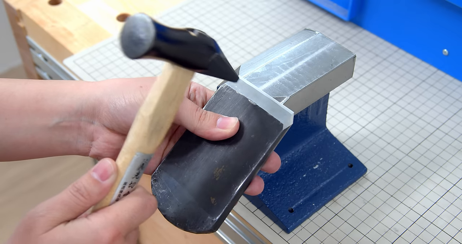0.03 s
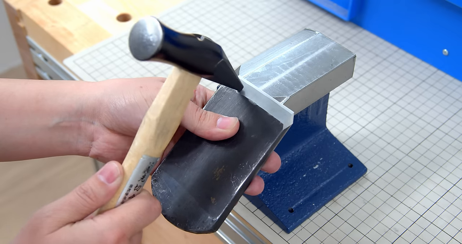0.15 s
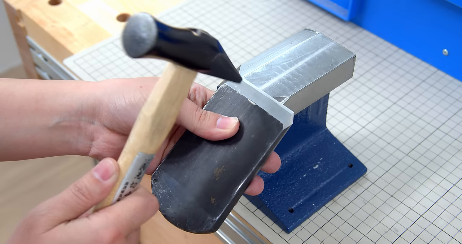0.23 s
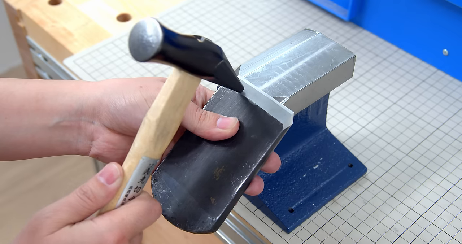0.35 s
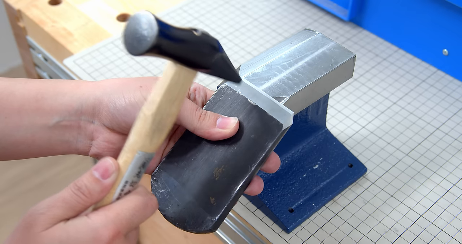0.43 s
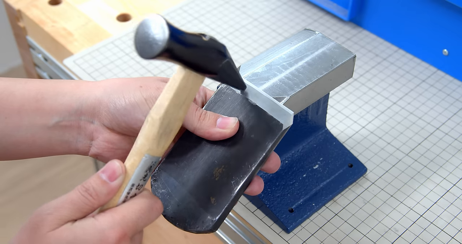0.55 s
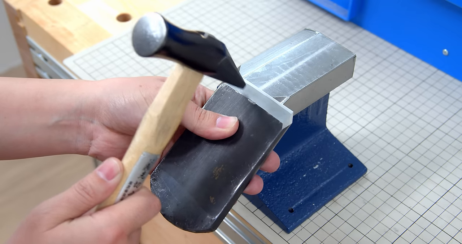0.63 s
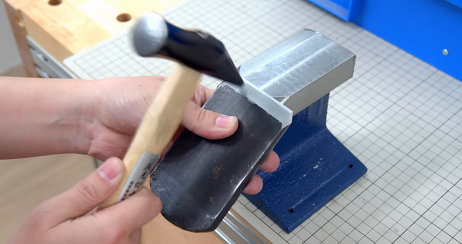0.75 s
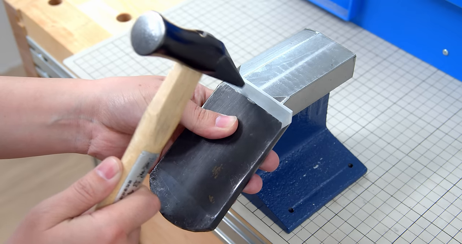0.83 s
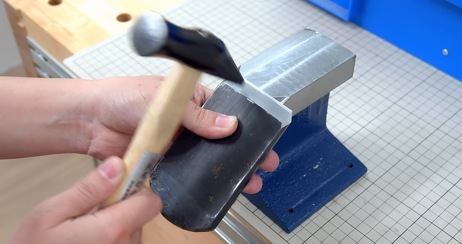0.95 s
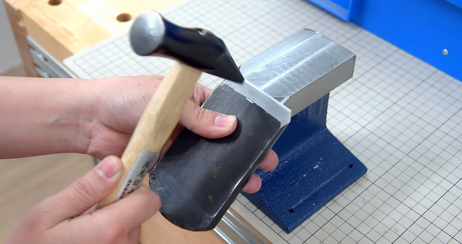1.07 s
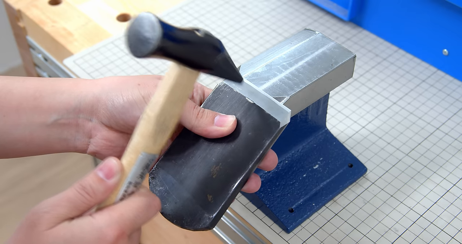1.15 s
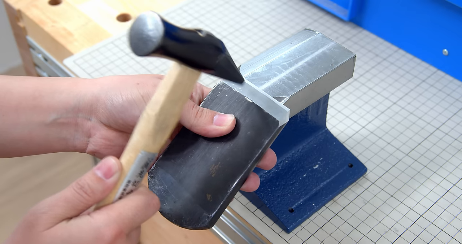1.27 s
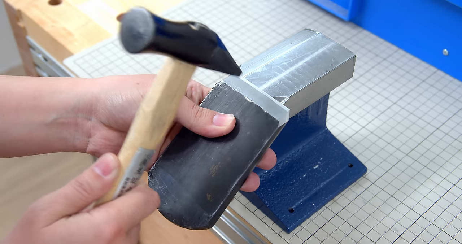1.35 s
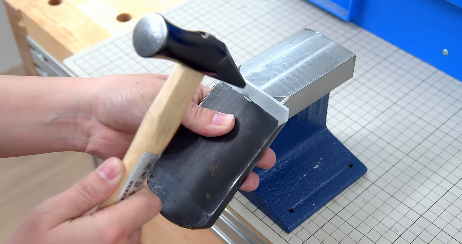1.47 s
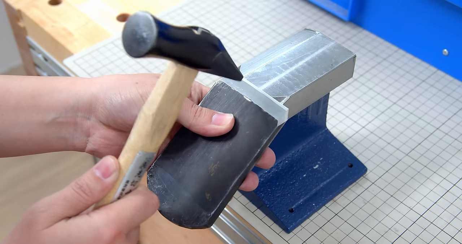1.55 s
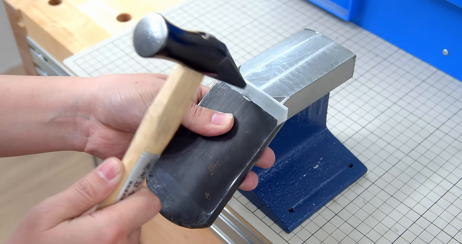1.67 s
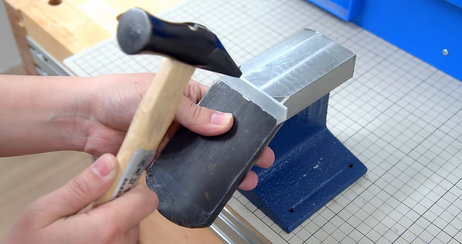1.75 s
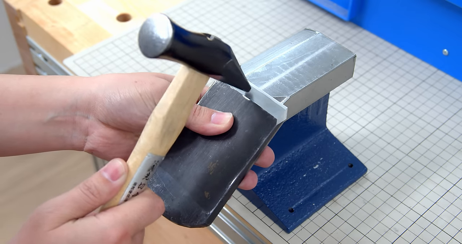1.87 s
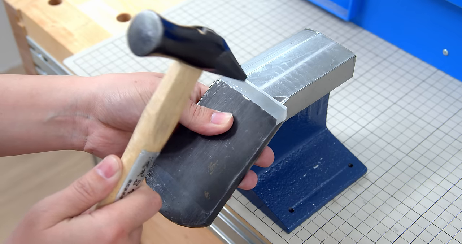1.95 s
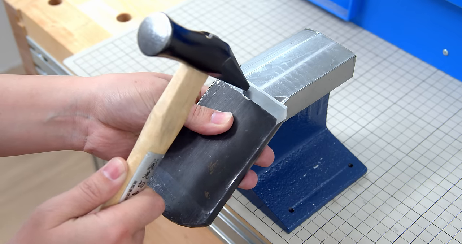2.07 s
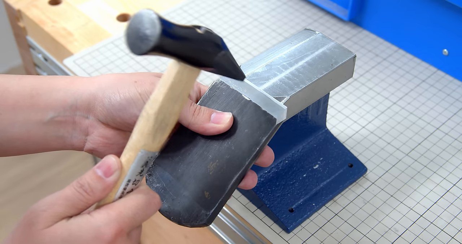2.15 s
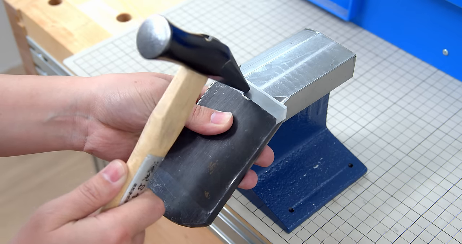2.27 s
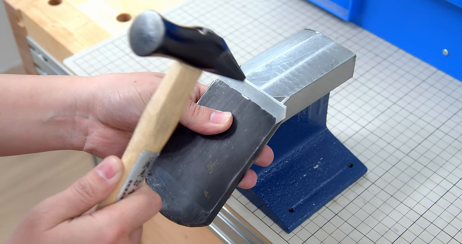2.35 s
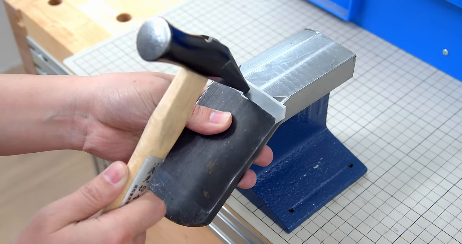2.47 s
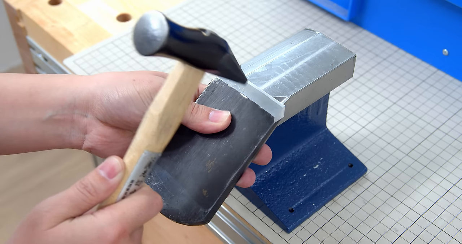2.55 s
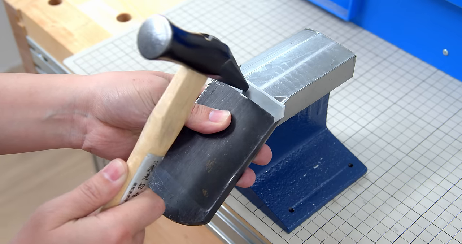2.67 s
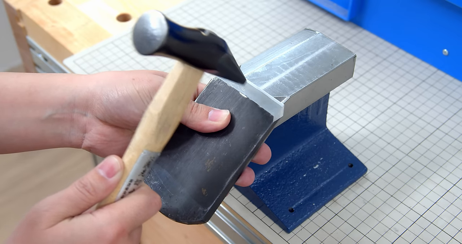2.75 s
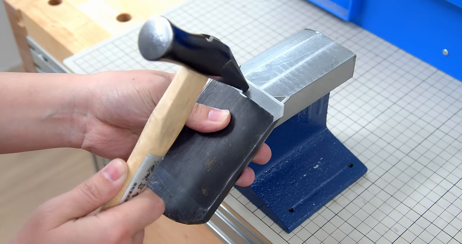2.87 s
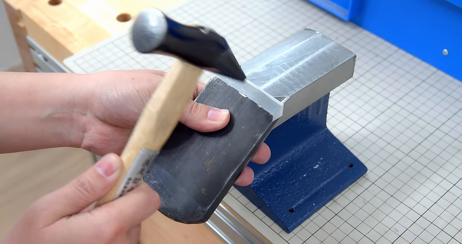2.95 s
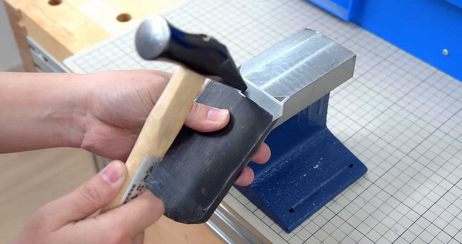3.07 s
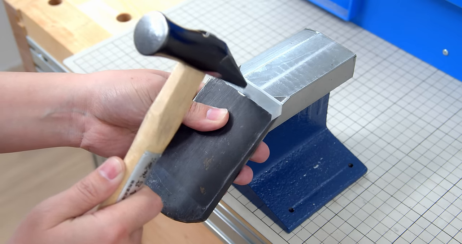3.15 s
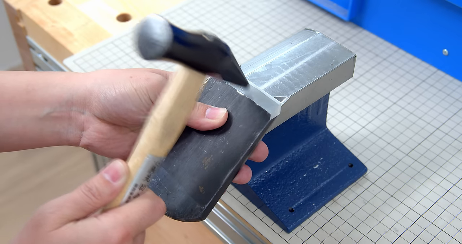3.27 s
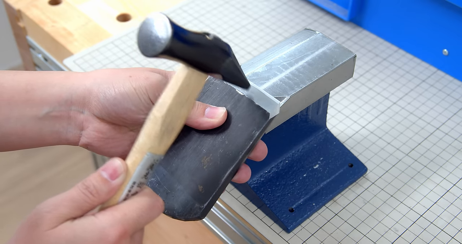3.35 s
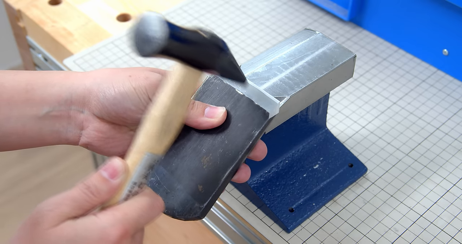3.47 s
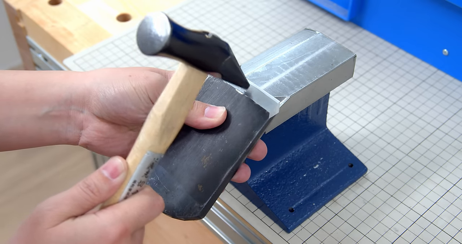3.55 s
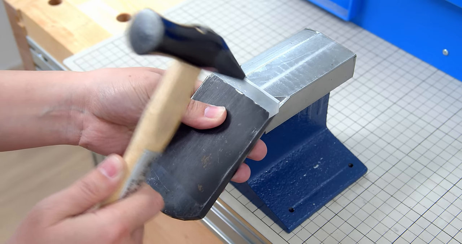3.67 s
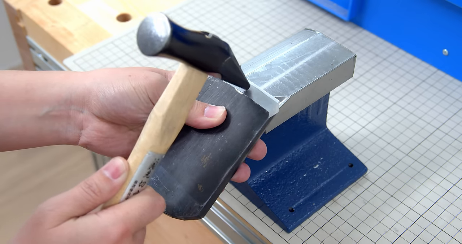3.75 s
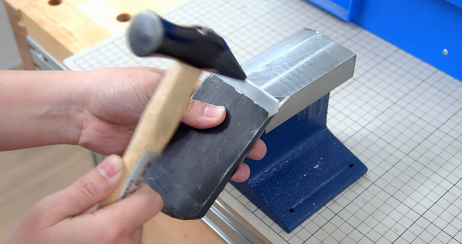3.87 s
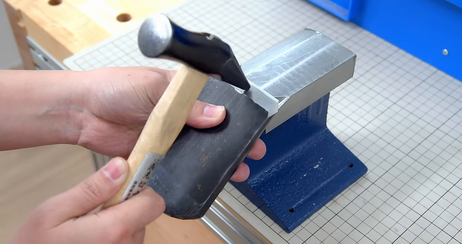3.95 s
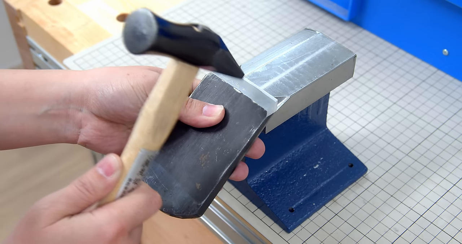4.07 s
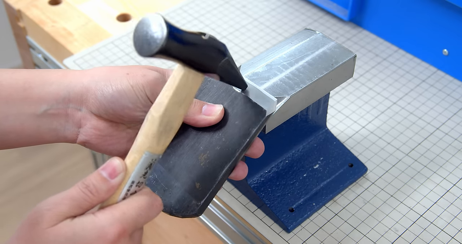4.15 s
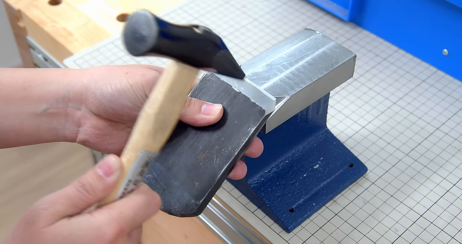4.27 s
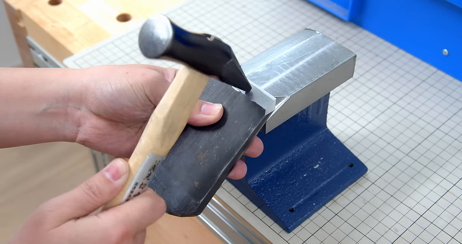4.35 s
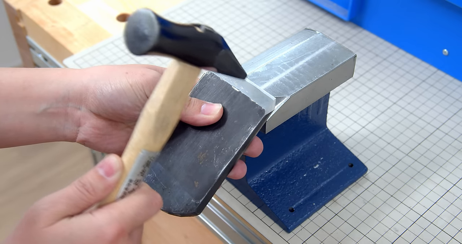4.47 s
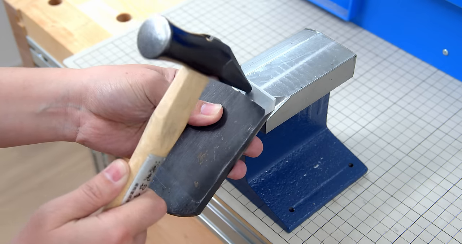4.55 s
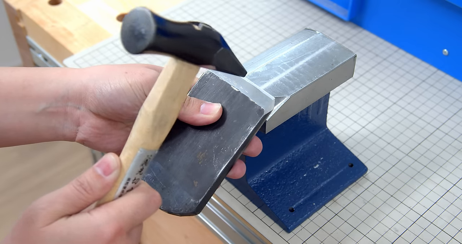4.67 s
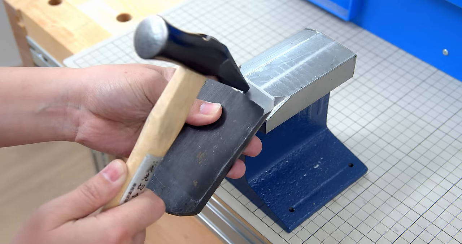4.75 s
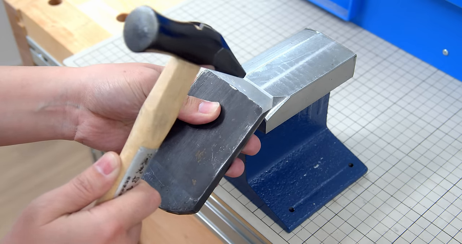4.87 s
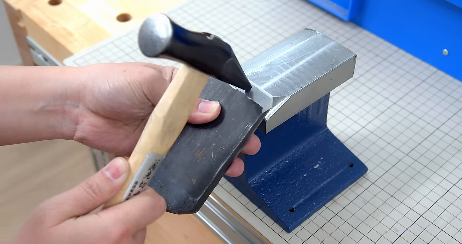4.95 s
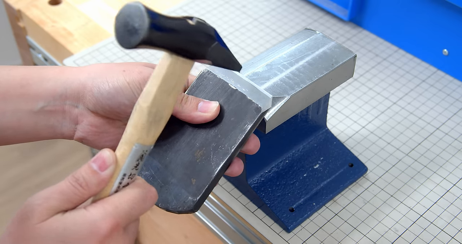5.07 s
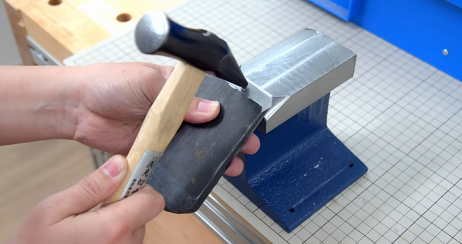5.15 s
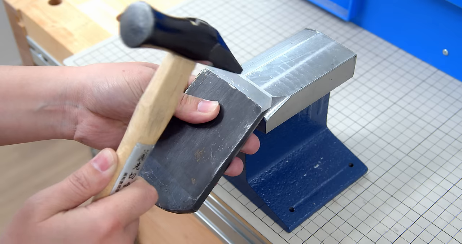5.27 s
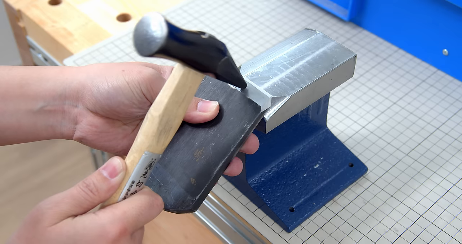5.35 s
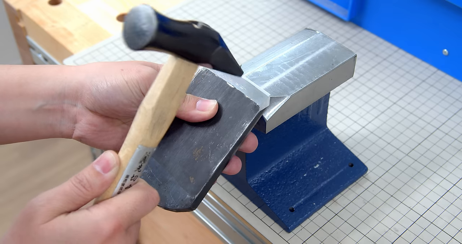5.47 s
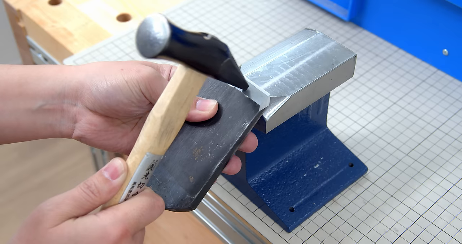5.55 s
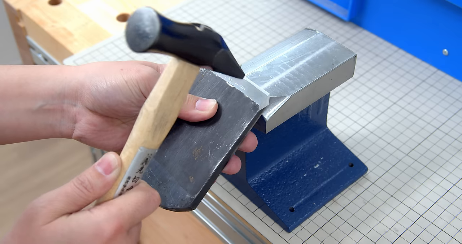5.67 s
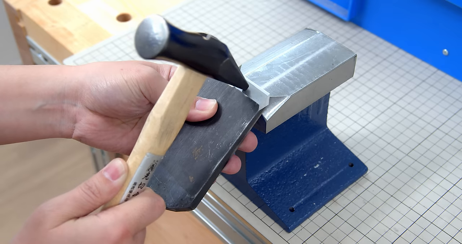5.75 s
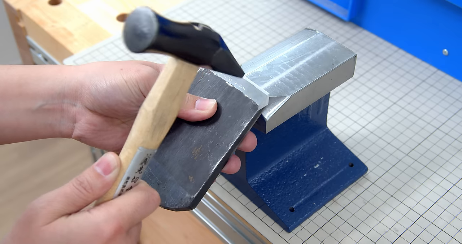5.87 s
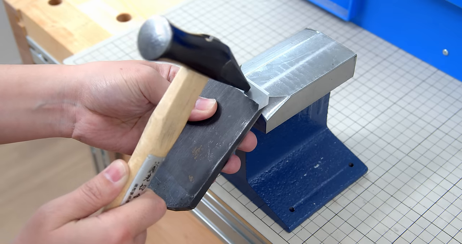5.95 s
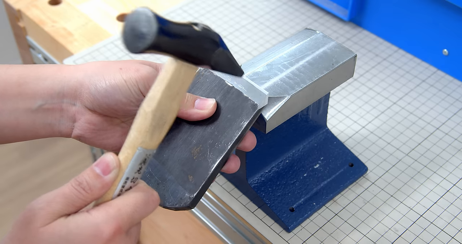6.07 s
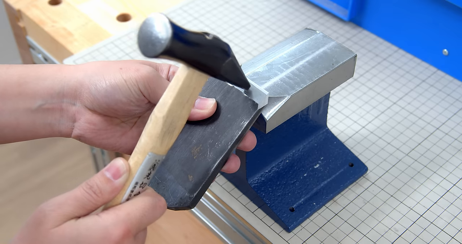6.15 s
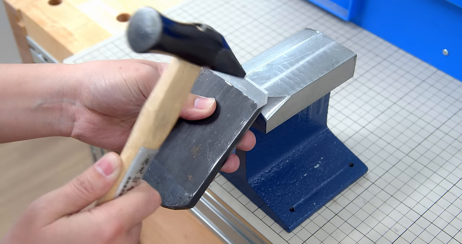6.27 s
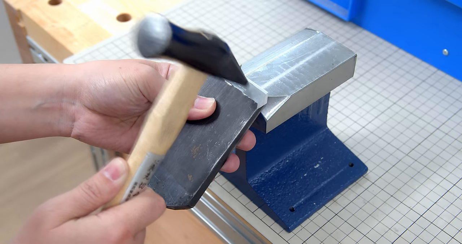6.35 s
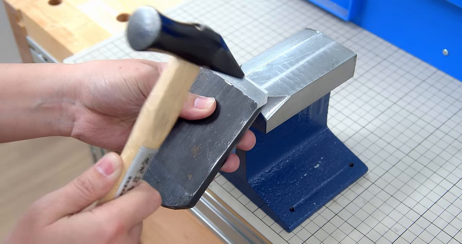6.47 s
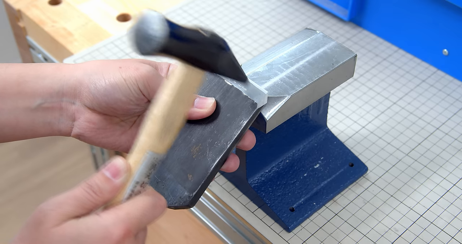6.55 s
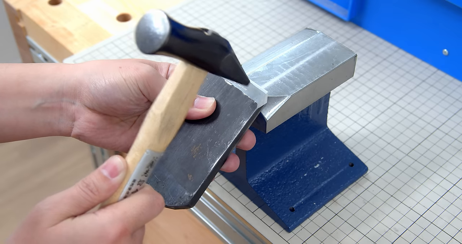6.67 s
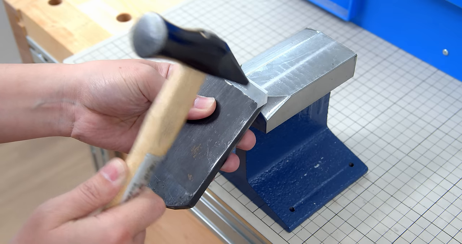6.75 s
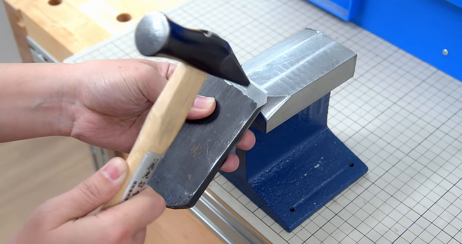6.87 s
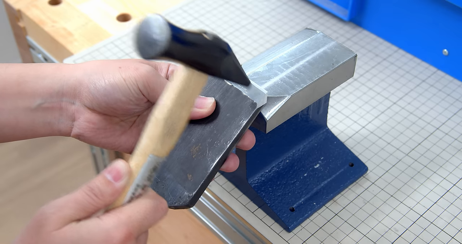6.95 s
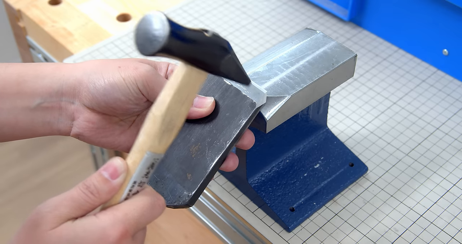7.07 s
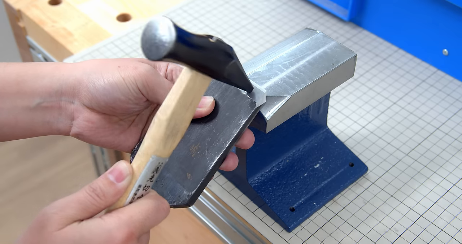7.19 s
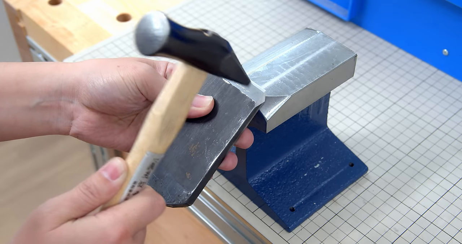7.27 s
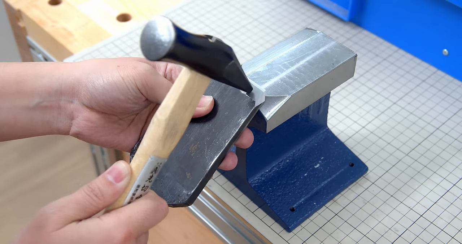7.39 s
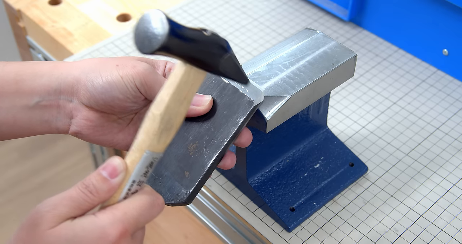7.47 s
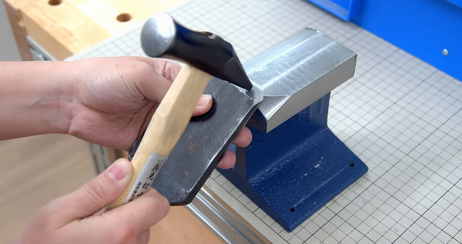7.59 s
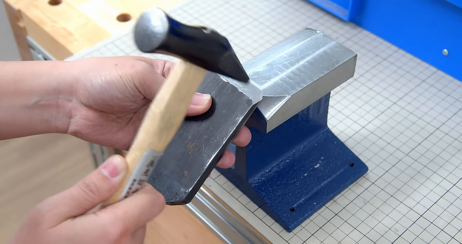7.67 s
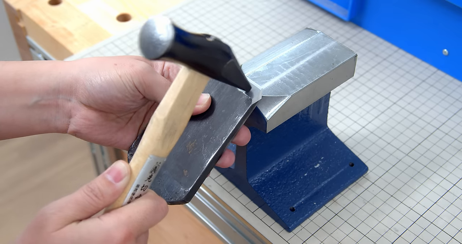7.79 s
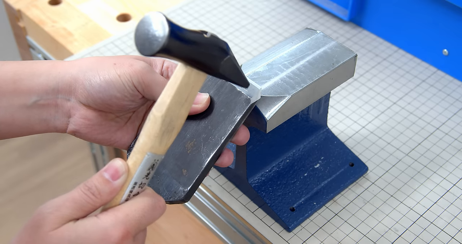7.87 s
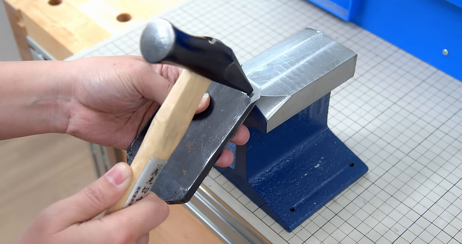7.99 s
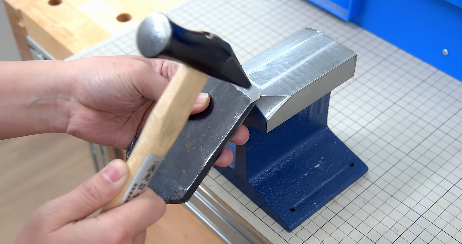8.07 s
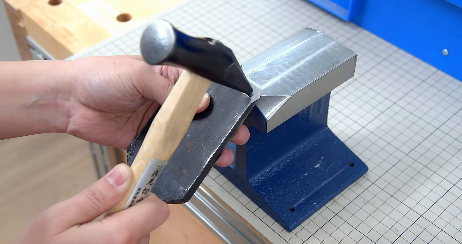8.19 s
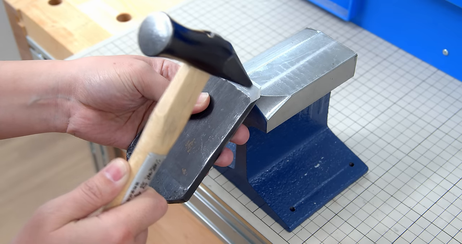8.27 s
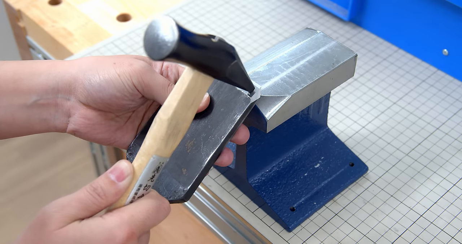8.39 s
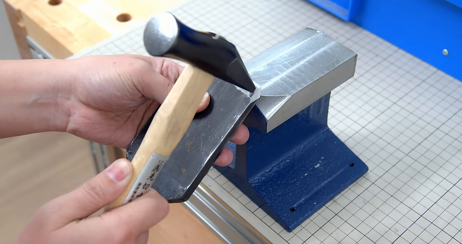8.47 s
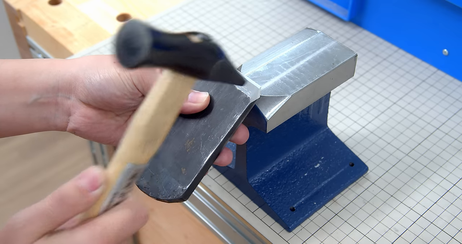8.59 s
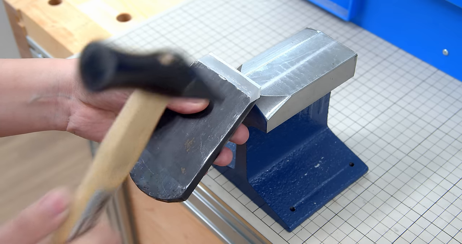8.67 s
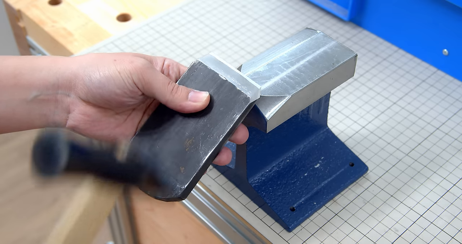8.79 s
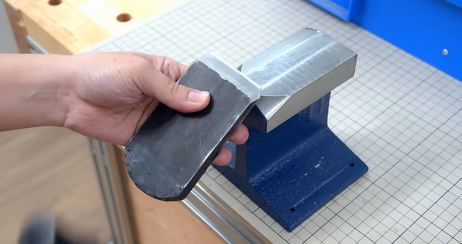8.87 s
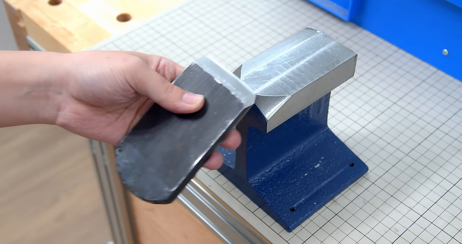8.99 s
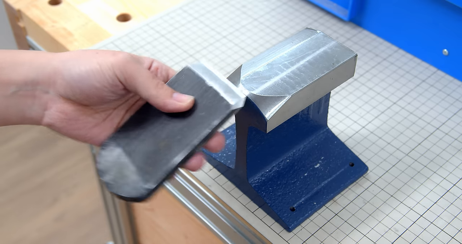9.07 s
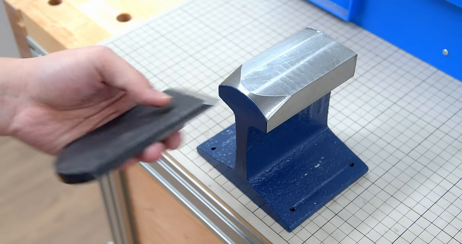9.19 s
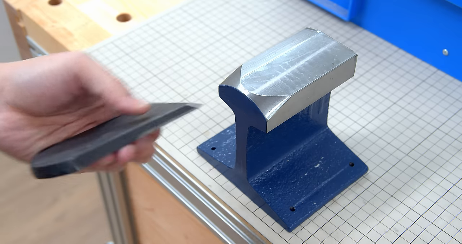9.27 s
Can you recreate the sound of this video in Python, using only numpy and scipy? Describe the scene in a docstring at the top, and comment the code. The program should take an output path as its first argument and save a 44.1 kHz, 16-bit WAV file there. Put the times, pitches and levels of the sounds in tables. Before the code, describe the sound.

The tail of a previous tap is dying away at the very start. From about 0.2 s a small hammer strikes the edge of a hand-held steel blade on a bench anvil, steadily, roughly every 0.2 s, until about 8.45 s. Each tap is a hard, bright click with strong energy in the upper treble, a thin steel ring damped within a few hundredths of a second with faint high tones lingering, and a short low-mid thud of the stand and bench. Strength and ring colour change subtly as the blade is fed sideways; the tap near 8.05 s rings noticeably less. The small workshop answers with dense echo of about a quarter second. After the last tap the microphone's gain rises, bringing up low rumble and soft hiss; muffled bumps come at about 8.75 and 9.0 s, and a tiny lighter tick near 9.2 s.

```python
"""A small workshop: a hammer peens the edge of a hand-held steel plane blade on a bench anvil, five taps a second.
Each tap is a hard click of shaped noise, a short ring of decaying sines and a low thud of the bench.
The blade is fed steadily sideways, so the blows cross nodes and antinodes and the ring slowly changes colour.
Decaying standing waves and a dense noise echo make the room. When the tapping stops, the recorder's gain
comes up on the room's rumble and hiss and on the soft bumps of the tools being lifted away."""
import sys
import numpy as np
from scipy import signal
from scipy.fft import rfft, irfft, next_fast_len
from scipy.io import wavfile
from scipy.ndimage import uniform_filter1d, minimum_filter1d

SR = 44100
rng = np.random.default_rng(int(sys.argv[2]) if len(sys.argv) > 2 else 0)


def dump(signal):
    """Clip the signal to [-1, 1] and save it as 16-bit WAV at the path in sys.argv[1]."""
    limited = np.clip(np.atleast_2d(signal).T, -1, 1)
    pcm = np.round(limited * 32767).astype(np.int16)
    wavfile.write(sys.argv[1], SR, pcm)


N = 411453
LEAD = SR // 10  # samples of lead-in, cut off again at the end
AGE = np.arange(SR * 3 // 4) / SR  # time since a blow [s]


def undb(db):
    """Decibels to gain."""
    return 10 ** (np.asarray(db) / 20)


def fade(t60):
    """Free exponential decay, down 60 dB after t60 seconds."""
    return np.exp(-np.log(1000) * AGE / t60)


def along(hz, points_hz, values):
    """Straight lines on a log-frequency axis."""
    return np.interp(np.log(np.maximum(hz, 1)), np.log(points_hz), values)


def bins(size):
    """Frequencies of a spectrum [Hz]."""
    return np.fft.rfftfreq(size, 1 / SR)


def unit(x):
    """Scale to rms 1."""
    return x / np.sqrt(np.mean(x ** 2))


def add(track, s, sound):
    """Mix a sound in at a time in seconds."""
    start = int(round(s * SR))
    track[start:start + len(sound)] += sound[:len(track) - start]


def partials(modes):
    """Sum of one decaying sine per mode; neighbouring modes swing in opposite directions."""
    total = np.zeros(len(AGE))
    for k, (hz, db, t60) in enumerate(modes):
        total += (-1) ** k * undb(db) * np.sin(2 * np.pi * hz * AGE) * fade(t60)
    return total


def at_place(shapes, place_mm, edge_mm=60):
    """Levels in dB for a blow on the edge: loud on an antinode, weak between two."""
    mean_db, swing_db, antinode_mm, spacing_mm, rise_db_per_mm = np.transpose(shapes)
    pattern_db = swing_db * np.cos(2 * np.pi * (place_mm - antinode_mm) / spacing_mm)
    tilt_db = rise_db_per_mm * (place_mm - edge_mm / 2)
    return mean_db + pattern_db + tilt_db


def ambience(level_db=-60.5):
    """A low rumble of the building under an even hiss, made of filtered noise."""
    # spectrum of rumble and hiss: (frequency [Hz], relative density [dB per Hz])
    rumble_and_hiss = [(20, -0.5), (50, -11), (82, -5.5), (120, -18), (200, -21), (350, -23), (600, -29.5),
                       (1500, -35), (4000, -42), (10000, -50.5), (15500, -54.5)]
    size = next_fast_len(N)
    colour = undb(along(bins(size), *np.transpose(rumble_and_hiss)))
    noise = irfft(rfft(rng.standard_normal(size)) * colour, size)
    return undb(level_db) * unit(noise[:N])


def handling():
    """Faint bumps of hand and tools: short fading bursts of octave-wide noise."""
    # soft bumps as the tools are lifted away: (time [s], centre [Hz], level [dB], t60 [s])
    bumps = [(8.753, 190, -58.5, 0.18), (8.982, 470, -65.5, 0.19), (9.226, 5000, -71, 0.046)]
    out = np.zeros(N)
    for s, hz, db, t60 in bumps:
        octave_hz = [hz / np.sqrt(2), hz * np.sqrt(2)]
        band = signal.butter(2, octave_hz, "bandpass", fs=SR, output="sos")
        rustle = unit(signal.sosfilt(band, rng.standard_normal(len(AGE))))
        add(out, s, undb(db) * rustle * fade(t60))
    return out


def workshop(x, first_echo_s=0.0015, build_s=0.0035, build_cycles=4):
    """Dense echoes from near walls, the same for every tap; lows build up late and the top treble dies first."""
    # diffuse echo of the workshop: (band centre [Hz], level [dB], t60 [s])
    walls = [(203, -2, 0.25), (551, -4, 0.3), (1030, -4, 0.33), (1990, -11.5, 0.27), (3300, -8.5, 0.32),
             (5400, -5, 0.27), (6900, -14, 0.28), (9650, -10, 0.23), (15100, -15, 0.088)]
    centres, levels_db, t60s = np.transpose(walls)
    noise, hz = rfft(rng.standard_normal(len(AGE))), bins(len(AGE))
    response = np.zeros(len(AGE))
    # each row of the identity picks one band, crossfading into its neighbours
    for share, centre, db, t60 in zip(np.eye(len(walls)), centres, levels_db, t60s):
        build_up = np.clip((AGE - first_echo_s) / (build_s + build_cycles / centre), 0, 1)
        shape = build_up * fade(t60)
        band = irfft(noise * along(hz, centres, share), len(AGE))
        response += undb(db) * band * shape / np.linalg.norm(shape)
    return signal.fftconvolve(x, response)[:len(x)]


def standing_waves():
    """Air modes of the small room, each ringing down as a sine after a thud."""
    # standing waves of the workshop: (frequency [Hz], relative level [dB], t60 [s])
    room_modes = [(63, -47, .3), (88, -36.5, .32), (127, -43, .28), (173, -39, .37), (225, -37, .3),
                  (269, -26.5, .2), (302, -41, .55), (315, -35, .26), (356, -31.5, .29), (393, -29, .22),
                  (449, -32.5, .25), (489, -44, .36), (527, -34.5, .3), (554, -33, .22), (597, -35.5, .25),
                  (629, -45, .32), (664, -40, .3), (704, -43, .32), (727, -37, .2), (779, -39, .22),
                  (867, -46, .33), (920, -50, .33), (1017, -52, .28)]
    return partials(room_modes)


def bench_thud():
    """The struck anvil stand and bench top, a few low modes that die quickly."""
    # anvil stand and bench top: (frequency [Hz], relative level [dB], t60 [s])
    bench_modes = [(39, -58, 0.67), (121, -27, 0.061), (238.4, -16.5, 0.047), (464, -11.5, 0.013),
                   (607.5, -10.5, 0.016), (1234, -21.5, 0.012), (1344, -21.5, .014), (1872, -16.5, 0.011),
                   (2083, -17.5, 0.015)]
    return partials(bench_modes)


def contact_click(place_mm, scatter_t60=0.018, whitening_floor=0.27):
    """The steel-on-steel contact as a noise burst, scattered over milliseconds as it runs through the blade."""
    # spectrum of the contact: (frequency [Hz], relative level [dB])
    contact_colour = [(300, -21), (1000, -6.5), (2000, -5.5), (2400, 1.5), (3500, 4), (4700, 6),
                      (5400, 1.5), (6500, 4), (8500, -0.5), (10500, 4), (12000, -6), (15000, -10),
                      (16500, -22.5)]
    # frequencies of the place-dependent levels [Hz]
    place_hz = (2000, 4500, 6200, 9500)
    # change along the edge, one row per place_hz:
    # (mean [dB], swing [dB], an antinode [mm], antinode spacing [mm], rise along the edge [dB per mm])
    place_shapes = [(7, 0.56, 40, 60, 0.022), (-2.5, 2.5, 33.3, 67, -0.013), (0.5, 4.2, 50, 75, 0.07),
                    (-3.5, 1.8, 49, 40, -.03)]
    hz = bins(len(AGE))
    burst = rfft(rng.standard_normal(len(AGE)) * fade(scatter_t60))
    # partly flatten the random peaks and dips of the spectrum
    power = abs(burst) ** 2
    even = burst / np.sqrt(power + whitening_floor * np.mean(power))
    place_db = along(hz, place_hz, at_place(place_shapes, place_mm))
    colour = undb(along(hz, *np.transpose(contact_colour)) + place_db)
    return irfft(even * colour, len(AGE)) * (AGE < 2 * scatter_t60)


def steel_ring(place_mm, spread_db=0.5, detune=0.58):
    """Place sets how loud each mode rings; at random, level varies slightly and pitch within about its width."""
    # blade, hammer head and anvil; hand and contact damp most modes quickly, a few thin tones last:
    # (frequency [Hz], relative level [dB], t60 [s])
    steel_modes = [(2780, -39, .05), (3005, -34, .04), (3245, -29, .055), (3330, -35, .05),
                   (3680, -36, .03), (4200, -38, .018), (4480, -33, .016), (4800, -31, .016),
                   (5500, -38, .02), (7000, -32, .015), (7195, -20, .04), (7905, -25, .045),
                   (12690, -34, .025), (14200, -29, .02), (11050, -24, .022), (3130, -48, .24),
                   (5730, -56, .22), (6174, -48, .2), (7205, -54, .25), (11134, -48, .36), (11361, -76, .9),
                   (13159, -62, .22), (13253, -61, .22), (13423, -66, .2), (15310, -80, .45)]
    # frequencies of the place-dependent levels [Hz]
    place_hz = (3100, 3230, 4700, 7200, 7900, 11050, 11134, 12600)
    # change along the edge, one row per place_hz:
    # (mean [dB], swing [dB], an antinode [mm], antinode spacing [mm], rise along the edge [dB per mm])
    place_shapes = [(1, 4.5, 5.8, 20, -.02), (-1, 5, 25.8, 96, -0.05), (2.5, 8, 23, 72, -0.04),
                    (-5.5, 7, 6.2, 40, 0.2779), (0, 2, 13.3, 27.5, -0.0748), (-2, 3.5, 17.4, 18.5, 0.16),
                    (-9.5, 14.5, 6, 39.5, 0.14), (-1.6, 1.5, 16, 19, .06)]
    hz, db, t60 = np.transpose(steel_modes)
    # random for every tap and mode; side only sets the polarity
    loudness, shift, side = rng.standard_normal((3, len(hz)))
    place_db = along(hz, place_hz, at_place(place_shapes, place_mm))
    gains = np.sign(side) * undb(db + place_db + spread_db * loudness)
    damping = np.log(1000) / t60
    pitch = hz + detune * shift * damping / np.pi
    age = AGE[:len(AGE) // 2]
    tones = np.sin(2 * np.pi * np.outer(pitch, age)) * np.exp(-np.outer(damping, age))
    return gains @ tones


def hammering(feed_mm_per_s=7.0, contact_db=0.0, ringing_db=0.4, standing_db=-0.62):
    """All taps along the edge: the direct sound, and the standing waves that the bench sets off."""
    # hammer taps: (time [s], relative bench thud [dB], relative contact click [dB], relative steel ring [dB])
    taps = [(0.1834, -1, 3.5, 0), (0.4016, -0.5, 4.5, -1.5), (0.6209, 1, 3.5, 3), (0.8309, 0.5, -1.5, -1.5),
            (1.0366, -0.7, 0.5, 0), (1.2478, -0.7, -0.5, 1.5), (1.4661, 1, 1.5, -1), (1.6685, 0, -2.5, 1.5),
            (1.8778, 0.7, 2.5, 2.0), (2.0966, -0.3, 0.0, -2), (2.2964, 0, 2.0, 5), (2.512, -0.3, 2.5, 3),
            (2.7224, -0.4, -0.5, 2), (2.9209, 0.5, -1, 0), (3.1388, 1.3, 3, 0.5), (3.3538, 0.2, -0.5, 3),
            (3.558, 1.1, 0, 2), (3.7664, 0.9, 0.5, 0.5), (3.9725, 0.5, -2.0, 0.5), (4.1768, 2.1, -3.0, 0.5),
            (4.38, 1.6, 1, 1.5), (4.5826, 1.1, 1.5, 2.0), (4.799, 1.9, 3, 1), (5.0022, 1.2, 3.5, 1.5),
            (5.2093, 2.5, 3.5, 3), (5.4136, 2.1, 1, -1), (5.6156, 1.5, 2.0, 3), (5.8077, 0.9, -1.5, 3.5),
            (6.0152, 1.4, 0.5, -2), (6.22, 2.3, 2, 0.5), (6.4311, 3.5, 1.5, 4.5), (6.6364, 2.5, 0, 2),
            (6.8416, 0.6, 1.5, -1.5), (7.0392, -0.4, -1.5, -3.5), (7.2459, 1.4, 1, 1.5),
            (7.449, 1.9, 1.5, 3), (7.6502, 1.5, 0.5, 2.5), (7.8535, 1.9, 2, 4.0),
            (8.0502, -0.5, -1.5, -8.5), (8.2516, 1.7, 0.5, -2.0), (8.4546, 2, 0.0, -0.5)]
    # one tap falls just before the start and is already dying away there
    earlier_tap = (-.028, *taps[0][1:])
    direct, boom = np.zeros((2, LEAD + N))
    bench, standing = bench_thud(), standing_waves()
    for s, thud_db, click_db, ring_db in [earlier_tap, *taps]:
        place_mm = feed_mm_per_s * s
        start_s = s + LEAD / SR
        contact = undb(contact_db + click_db) * contact_click(place_mm)
        ring = undb(ringing_db + ring_db) * steel_ring(place_mm)
        # the bench top is driven down, away from the microphone
        add(direct, start_s, contact - undb(thud_db) * bench)
        add(direct, start_s, ring)
        add(boom, start_s, undb(thud_db + standing_db) * standing)
    return direct, boom


def scene():
    """Taps, their room, and the quiet behind them."""
    direct, boom = hammering()
    tapping = (direct + boom + workshop(direct))[LEAD:]
    return (tapping + handling() + ambience())[None]


def gain_control(x, threshold_db=-26, boost_db=16, hold_s=.135):
    """Gain stays down for a moment after anything loud and rises in the quiet."""
    level_db = 10 * np.log10(np.maximum(uniform_filter1d(x ** 2, size=900), 1e-12))
    wanted_db = np.clip(threshold_db - level_db, 0, boost_db)
    half = int(hold_s * SR / 2)
    # lowest gain wanted during the hold time just past
    held_db = minimum_filter1d(wanted_db, 2 * half + 1, origin=half, mode="nearest")
    return x * undb(uniform_filter1d(held_db, size=400))


def record(dry, low_cut_hz=34, top_hz=16500):
    """The recorder drops the deepest bass, rides its gain and cuts the top."""
    low_cut = signal.butter(2, low_cut_hz, "highpass", fs=SR, output="sos").repeat(2, axis=0)  # run twice
    thinned = signal.sosfilt(low_cut, dry)
    top_cut = signal.ellip(8, .2, 70, top_hz, fs=SR, output="sos")
    return signal.sosfilt(top_cut, gain_control(thinned))


dry = scene()
out = record(dry)
dump(out)
```